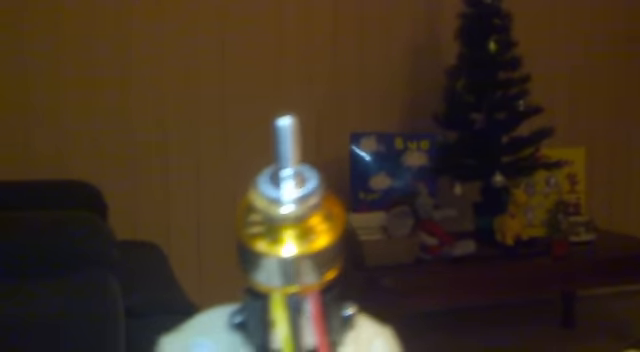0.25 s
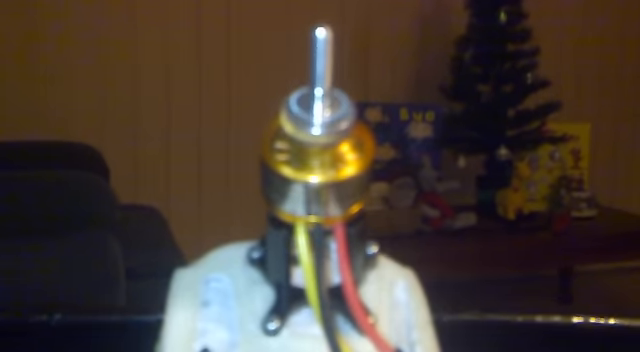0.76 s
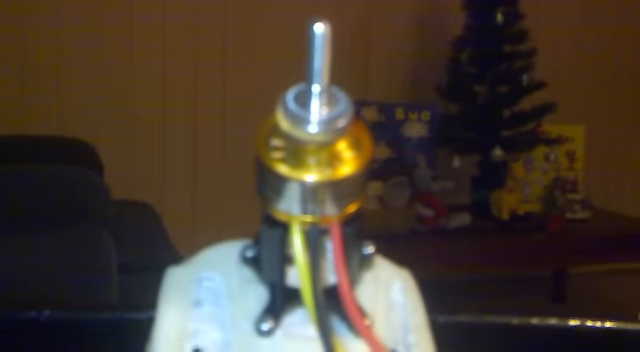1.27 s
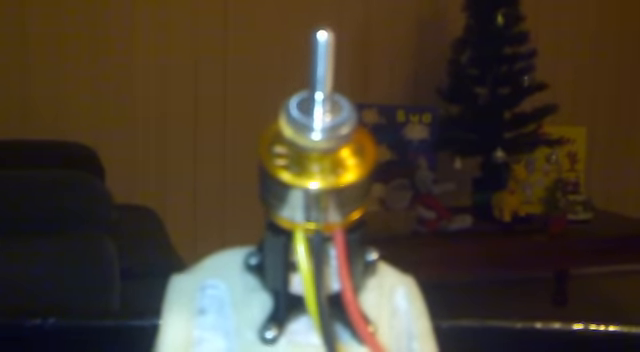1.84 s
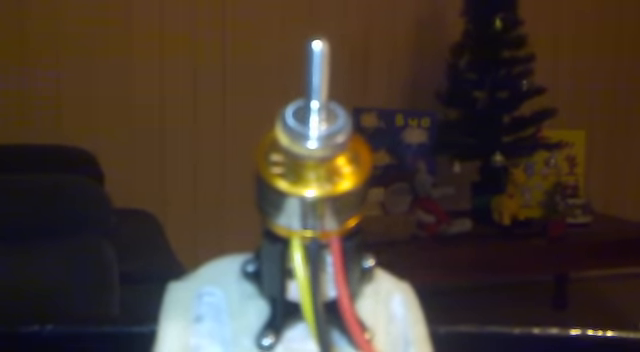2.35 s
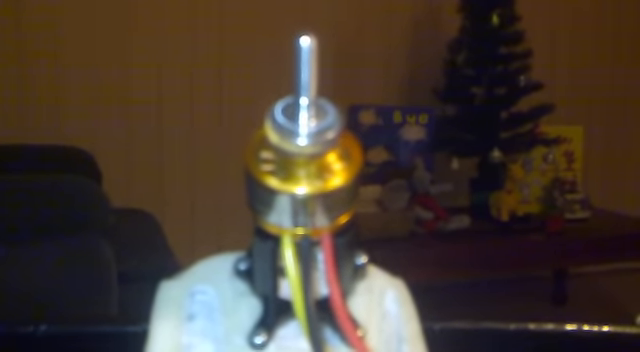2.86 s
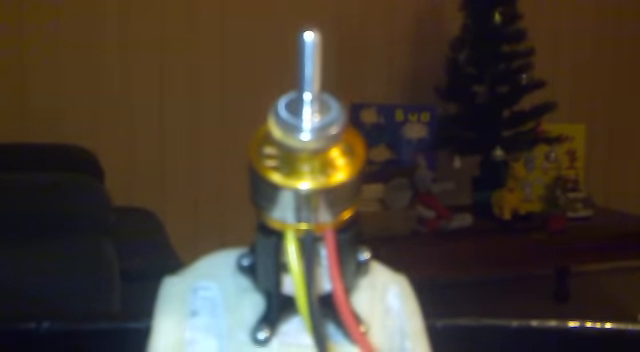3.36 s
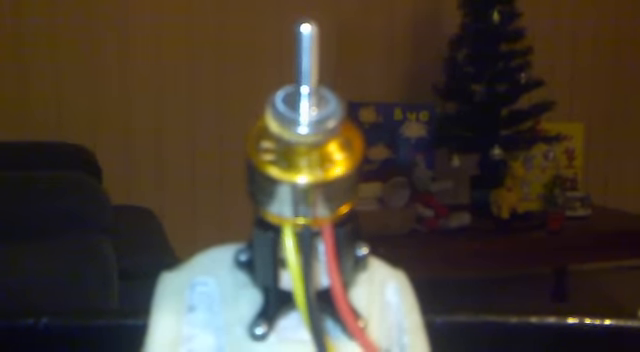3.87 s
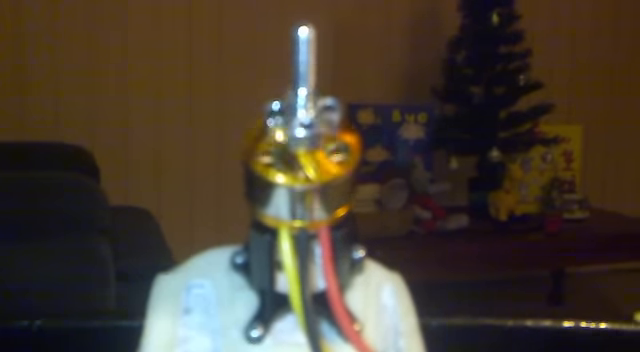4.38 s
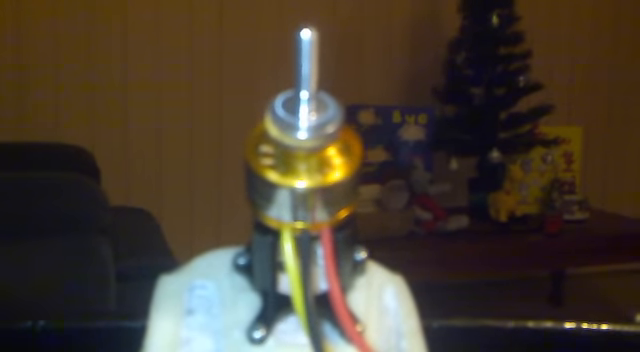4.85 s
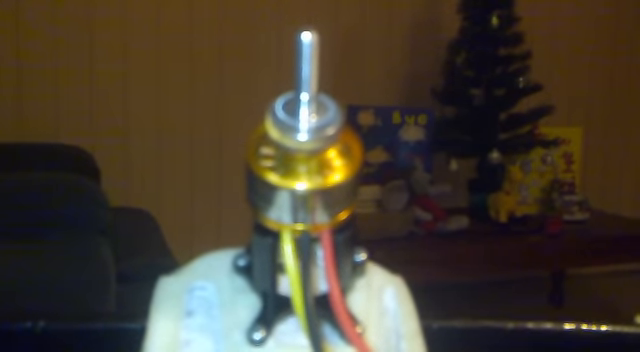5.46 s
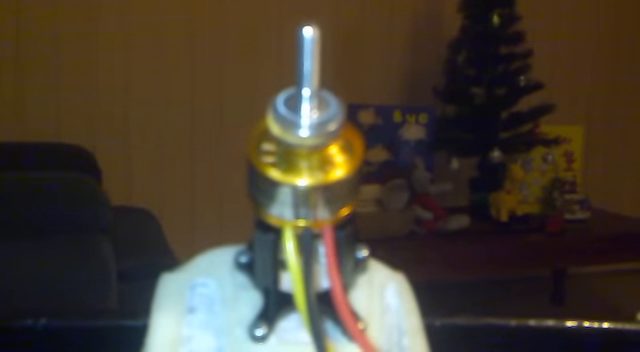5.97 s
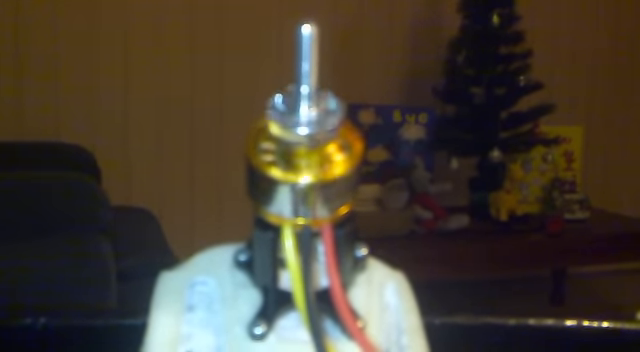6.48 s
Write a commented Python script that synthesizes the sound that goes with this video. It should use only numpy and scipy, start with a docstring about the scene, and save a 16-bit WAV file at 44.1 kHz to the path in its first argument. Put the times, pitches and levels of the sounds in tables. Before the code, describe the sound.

A small electric motor with a dry bearing rattles and squeals loudly, speeds up, winds down, restarts smoothly with a thin whistle, rattles again and coasts.

```python
"""The dry ball bearing of a small brushless outrunner, close to the microphone in a living room.
The motor has no propeller. Its bearing squeals on the tones of the turning cage and knocks with random ball hits;
the shaft speeds up, winds down and stops. It restarts smoothly with a thin whistle of chopped drive current,
the bearing breaks into rattling again, and the motor coasts to rest and just begins another start.
Slot whine, rolling hiss, hum and rumble follow the same shaft; a short room tail and faint room noise lie behind."""
import sys
import numpy as np
from scipy import signal
from scipy.fft import rfft, irfft
from scipy.io import wavfile
from scipy.ndimage import uniform_filter1d, minimum_filter1d

SR = 44100
rng = np.random.default_rng(int(sys.argv[2]) if len(sys.argv) > 2 else 0)


def generate_wav(sig):
    """Save sig (samples, or channels by samples) to the path in sys.argv[1] as 16-bit PCM at SR."""
    pcm = np.round(np.clip(np.atleast_2d(sig).T, -1, 1) * 32767).astype(np.int16)
    wavfile.write(sys.argv[1], SR, pcm)


N = 296352
TIME = np.arange(N) / SR

# The bearing cage catches and shrieks: (time [s], level [dB], length [s])
SHRIEKS = [(1.865, -12, .008), (2.1, -13, .015), (2.6, -13, .02), (2.977, -10, .005), (3.034, -14.5, .02),
           (3.098, -18, .03), (3.16, -9, .008), (3.194, -15, .01), (3.302, -14, .003), (3.437, -25, .03),
           (5.249, -12.5, .016), (5.374, -10, .032), (5.452, -12.5, .008), (5.509, -15.5, .009),
           (5.54, -16, .008), (5.556, -13, .011), (5.686, -15, .022), (5.781, -14.5, .0033)]
SHRIEK_HZ, BALLS = 1680, 6
CAGE_RATIO = .3975  # cage turns per shaft turn
# Tones of the six-ball cage, one entry per tone: (multiple of the cage speed)
CAGE_MULTIPLES = [6, 8, 11, 12, 13, 16, 18, 24, 30, 36, 42, 48, 54]
# The same tones: (relative level [dB])
CAGE_DB = [-9, -14, -4, -9.5, -4.5, -11.5, -1.2, 0, -6, -7, -13, -12, -16.5]
# The same tones: (share of power that flutters [0-1])
CAGE_ROUGH = [.8, .4, .6, .25, .45, .25, .72, .54, .88, .88, .95, .95, .95]
# Cage tones break up into flutter as they rise through this range: (from [Hz], to [Hz])
BREAK_UP_HZ = (1740, 2050)
# Stretches where the bearing rattles: (from [s], to [s])
RATTLES = [(0, 3.962), (5.238, 6.04)]
# Rattle against shaft speed: (speed [turns/s], relative squeal [dB], relative knocking [dB],
# relative hard metal contact [dB], gain of the highest fizz within the metal [dB])
RATTLE_BY_SPEED = [(51.7, -25, -22.5, -41, -23), (110.9, -20.5, -16.5, -29.5, -7.5),
                   (148, -12, -18.5, -23.5, -9), (177, -9.5, -20, -21.5, -1),
                   (203, -12, -19.5, -20.5, -0.5), (230.3, -5.5, -21, -21.5, 3)]
# The balls clatter harder for a moment: (time [s], lift of the metal contact [dB])
CLATTERS = [(.42, 4), (.93, 5.5), (1.49, 5.5), (1.694, 7), (1.87, 6.5), (2.29, 5), (2.411, 6.5), (2.49, 9),
            (2.672, 5), (2.742, 9.5), (2.868, 6.5), (3.031, 6), (3.303, 7.5), (3.385, 5), (5.25, 9.5),
            (5.56, 2.5), (5.65, 5)]
CLATTER_S = 0.019
# Wobble of the shaft in its worn bearing, driving rattle, hum and rumble: (time [s], lift [dB])
WOBBLE = [(0, 2), (.42, 0), (.55, -2.5), (1.38, -3), (1.75, -5.5), (2.6, -8), (3.15, -9), (3.95, -13),
          (5.3, -12), (6.05, -14.5)]

# Broad response of motor and mount: (frequency [Hz], gain [dB])
BODY = [(30, -31.5), (120, -24.5), (370, -14), (490, -6), (700, 5), (980, -9.5), (1250, 3), (1900, 5),
        (2400, -5.5), (4600, 0.5), (5700, -12.5), (8500, -18.5), (12500, -22), (15500, -21.5)]
# Ringing modes on top of that response: (frequency [Hz], width [Hz], lift [dB])
MODES = [(527, 74, 4), (744.4, 12, 2.5), (918, 34, 5.9), (1046, 72, 7), (1160, 170, 1.4), (1390, 110, 4.6),
         (1570.5, 125, 11.25), (1683.5, 110, 6.14), (2078, 400, 8.5), (2721, 93, 6), (4140, 460, 1.1),
         (5177, 410, 15.9), (5847, 180, 8.7), (7330, 1200, 7.8), (9560, 1000, 3.3), (14600, 1400, 5.8)]
BELL_HZ, BELL_WIDTH_HZ = 4360, 550  # main ring of the rotor bell

# Runs of the motor: (power on [s], power off [s], dry friction when coasting [turns/s per s])
RUNS = [(-2, 3.97, 87), (4.6, 6.05, 122), (6.685, 8, 122)]
# Throttle: (time [s], shaft speed asked for [turns/s])
THROTTLE = [(0, 170), (.15, 174.5), (.5, 177), (1.43, 177.5), (1.6, 222), (2.74, 222.5), (2.95, 203),
            (3.11, 177), (3.3, 140), (3.7, 77), (3.97, 49), (4.6, 164), (5.28, 165), (5.42, 173),
            (5.56, 175.5), (5.8, 157), (5.9, 151), (6.05, 125)]
# Soft start: first kick [share of the speed], time to about half speed [s], steepness of the S-curve
KICK, HALF_SPEED_S, START_STEEPNESS = .075, .207, 3.5
DRAG_PER_S = 1.55
CRUISE_HZ = 177  # shaft turns per second

# Tones of the twelve-slot stator, one entry per tone: (multiple of the shaft speed)
SLOT_MULTIPLES = [2, 3, 4, 8, 10.5, 12, 14, 17, 24, 25, 28, 36, 56]
# The same tones under power: (relative level [dB])
DRIVEN_DB = [-12, -24, -20, -15, -2, 7, -4, -13, 4, 1, 5, -2, -3]
# The same tones when coasting: (relative level [dB])
COASTING_DB = [-30, -30, -30, -20, -20, 1, -30, -30, -9, -30, -30, 2, -30]
# The slowing rotor cogs and rocks its mount: (time [s], lift of the mount's ring [dB], length [s])
ROCKS = [(4.163, 17.5, .045), (4.248, 12, 0.037), (6.423, 8, 0.047), (6.562, 8, 0.027)]

# Switching tones: (multiple of the switching rate, offset [shaft speeds], relative level [dB])
SWITCH_TONES = [(1, 0, -3), (1, -14, 6), (1, 14, -6), (1, -28, -8), (1, 9, -16), (1, 12, -17), (2, 0, -10),
                (2, -14, -11), (2, -4, -12)]
SWITCH_HZ = 7640

# Hum of the unbalanced rotor: (shaft speed [turns/s], level before the wobble [dB])
HUM_BY_SPEED = [(50, -82), (110, -72), (128, -53), (142, -47), (155, -41), (177, -35), (222, -36.5)]
HUM_NULL_HZ, HUM_NULL_WIDTH_HZ = 211.5, 7

# Reverberation of the furnished room: (frequency [Hz], time to fall by 60 dB [s])
ROOM_T60 = [(200, 0.76), (1500, 0.23), (5000, 0.047), (15000, 0.12)]
# Colour of the room noise: (frequency [Hz], relative density [dB per Hz])
FLOOR = [(30, -20.5), (140, -10), (450, -9), (800, -20), (1500, -28), (15000, -42)]
FLOOR_DB = -84
# Low hum in the room: (frequency [Hz], level before wavering [dB])
ROOM_HUM = [(140, -86.5), (270, -84)]
EDGE_HZ = 15800  # upper band limit


def bearing(speed, angle, squeal_db=-1.0, knock_db=3.0, metal_db=0., shriek_db=0., split_hz=2400,
            trade_db=1.3, trade_hz=14, restless_db=1.6):
    """The rattling bearing: squeal and dull knocks take turns, under a bright edge that dulls as the rotor slows."""
    table = np.asarray(RATTLE_BY_SPEED)
    squealing, knocking, contact, fizzing = (
        amp(read(np.c_[table[:, 0], column], speed)) for column in table.T[1:])
    trade = amp(trade_db * np.clip(wander(trade_hz), -2, 2))

    whirl = steady(squeal(speed, angle), 0.035) * squealing * amp(squeal_db) * trade

    dull, bright = split(knocks(speed, angle), split_hz)
    dull = steady(dull, 0.34) * knocking * amp(knock_db) / trade

    ring, fizz = split(bright, 5000)
    clatter_db = sum(db * bump(s, CLATTER_S) for s, db in CLATTERS)
    clatter = amp(clatter_db + restless_db * wander(14))
    metal = steady(ring + fizz * fizzing, 0.16) * contact * amp(metal_db) * clatter

    rattling = sum(gate(start, end, edge_s=0.002) for start, end in RATTLES)
    rattle = (whirl + dull + metal) * rattling * amp(curve(WOBBLE))
    return rattle + amp(shriek_db) * shrieks(speed, angle)


def squeal(speed, angle, flutter_hz=55, surge_db=2.5):
    """Balls whirl with the slipping cage; its tones swell as they cross the modes of the motor."""
    cage_angle = CAGE_RATIO * angle + .02 * wander(12)  # radians, with a little slip
    # The flutter is read along the turning itself, so it slows down with the shaft
    turning_time = np.cumsum(speed / 180) / SR
    tones = np.zeros(N)
    for multiple, db, rough in zip(CAGE_MULTIPLES, CAGE_DB, CAGE_ROUGH):
        complex_noise = wander(flutter_hz) + 1j * wander(flutter_hz)
        flutter = np.interp(turning_time, TIME, unit(complex_noise))
        tone_hz = multiple * CAGE_RATIO * speed
        rough = np.interp(tone_hz, BREAK_UP_HZ, (rough, max(rough, .86)))
        envelope = np.sqrt(1 - rough) + np.sqrt(rough) * flutter
        tones += amp(db) * (envelope * np.exp(1j * multiple * cage_angle)).real
    surging = amp(surge_db * np.interp(turning_time, TIME, wander(70)))
    return body(tones * surging)


def knocks(speed, angle, per_turn=26, spread_db=1.0, clump_db=2.0, load=0.21):
    """Loose balls hit the races, hardest when one passes the loaded side, and in clumps."""
    hits = (rng.random(N) < per_turn * speed / SR) * rng.choice([-1, 1], N)
    clumps = clump_db * np.clip(wander(53), -2, 2)
    size = amp(spread_db * rng.standard_normal(N) + clumps)
    passing = np.cos(BALLS * CAGE_RATIO * angle)
    return body(hits * size * (1 + load * passing))


def shrieks(speed, angle):
    """Brief swells of whichever ball-pass harmonic lies nearest the motor's main mode."""
    out = np.zeros(N)
    ball_pass = BALLS * CAGE_RATIO  # balls passing per shaft turn
    for s, db, length in SHRIEKS:
        multiple = round(SHRIEK_HZ / (ball_pass * np.interp(s, TIME, speed)))
        out += amp(db) * bump(s, length) * np.sqrt(2) * np.cos(multiple * ball_pass * angle)
    return out


def body(x):
    """The causal ring of the bell, stator and mount, as a minimum-phase response."""
    hz = np.fft.fftfreq(4096, 1 / SR)
    modes_db = sum(lift / (1 + (2 * (abs(hz) - f) / width) ** 2) for f, width, lift in MODES)
    log_gain = np.log(amp(read(BODY, hz) + modes_db))
    ring = np.fft.ifft(np.exp(np.conj(signal.hilbert(log_gain)))).real
    return signal.oaconvolve(x, ring[:len(ring) // 2])[:N]


def shaft_speed():
    """Turns per second: a soft start up to the throttle, then dry friction and drag once the power is cut."""
    speed = np.zeros(N)
    for on, off, friction in RUNS:
        rise = (np.maximum(TIME - on, 0) / HALF_SPEED_S) ** START_STEEPNESS
        driven = curve(THROTTLE) * (KICK + rise) / (1 + rise)
        friction_offset = friction / DRAG_PER_S
        speed_at_cut = np.interp(off, TIME, driven)
        decay = np.exp(-DRAG_PER_S * (TIME - off))
        coasting = (speed_at_cut + friction_offset) * decay - friction_offset
        speed = np.where(TIME < on, speed, np.where(TIME < off, driven, coasting))
    return np.maximum(speed, .1)  # stays above zero for the logarithms


def powered():
    """1 while the controller drives the windings."""
    return sum(gate(on, off, edge_s=.004) for on, off, friction in RUNS)


def surge(speed):
    """Share of the starting current, 0-1: back-EMF cuts it as the rotor reaches the speed asked for."""
    return powered() * np.clip(1 - speed / curve(THROTTLE), 0, 1)


def by_speed(speed, db_per_octave):
    """Gain that grows with every doubling of the speed; 1 at cruise."""
    return amp(db_per_octave * np.log2(speed / CRUISE_HZ))


def whine(speed, angle, driven_db=-62.0, coasting_db=-66.0, db_per_octave=3.0, stall_hz=11,
          shudder_db=-23., shudder_hz=900, mount_hz=470, mount_width_hz=150, mount_db=-48.0, bell_db=12.5):
    """Magnets sweep the stator slots; the ripple rocks the slow mount and rings the bell under heavy current."""
    current = powered()
    waver = .5 - .15 * current
    slots = np.zeros(N)
    for multiple, driven, coasting in zip(SLOT_MULTIPLES, DRIVEN_DB, COASTING_DB):
        level = amp(coasting + current * (driven - coasting))
        slots += level * (1 + waver * wander(30)) * np.cos(multiple * angle)
    shudder = amp(shudder_db) * unit(band(rng.standard_normal(N), shudder_hz, "low", order=2))
    ripple = body(slots + shudder)

    bell = resonance(ripple, BELL_HZ, BELL_WIDTH_HZ) * amp(bell_db) * surge(speed)
    direct = (ripple + bell) * amp(coasting_db + current * (driven_db - coasting_db))

    mount = resonance(resonance(ripple, mount_hz, mount_width_hz), mount_hz, mount_width_hz)
    cogging = 1 / (1 + (speed / 70) ** 2)  # rocks the mount mostly when slow
    rocking = amp(mount_db + sum(db * bump(s, length) for s, db, length in ROCKS))

    sound = band(direct + rocking * cogging * mount, 280, "high")  # the small motor radiates little bass
    turning = np.minimum(speed / stall_hz, 1) ** 2  # fades out towards standstill
    return sound * turning * by_speed(speed, db_per_octave)


def rolling(speed, driven_db=-54.5, coasting_db=-66.0, db_per_octave=7.5, bell_db=-31.0,
            bell_db_per_octave=9.0, top_hz=4400):
    """Smoothly rolling balls hiss; the heavy current of acceleration also rings the rotor bell."""
    hiss = band(body(rng.standard_normal(N)), top_hz, "low", order=2)
    hiss = hiss / np.std(band(hiss, 2500, "high"))  # levels refer to the part above 2500 Hz
    hiss = hiss * amp(coasting_db + powered() * (driven_db - coasting_db))
    bell = resonance(rng.standard_normal(N), BELL_HZ, BELL_WIDTH_HZ)
    bell = unit(resonance(bell, BELL_HZ, BELL_WIDTH_HZ))
    bell = amp(bell_db) * bell * surge(speed) * by_speed(speed, bell_db_per_octave)
    return hiss * by_speed(speed, db_per_octave) + bell


def controller(speed, angle, whistle_db=-63.5, surge_db=7.5, swell_s=0.18, waver=0.27):
    """Chopped winding current whistles, with sidebands that spread as the fourteen poles speed up."""
    carrier = 2 * np.pi * SWITCH_HZ * TIME
    tones = np.zeros(N)
    for multiple, offset, db in SWITCH_TONES:
        phase = multiple * carrier + offset * angle + 2 * np.pi * rng.random()
        tones += amp(db) * (1 + waver * wander(30)) * np.cos(phase)
    duty = sum(gate(on, off, edge_s=.004) * np.clip((TIME - on) / swell_s, .25, 1)
               for on, off, friction in RUNS)
    duty = duty * by_speed(curve(THROTTLE), db_per_octave=15.5)
    return np.sqrt(2) * tones * duty * amp(whistle_db + surge_db * np.sqrt(surge(speed)))


def unbalance(speed, angle):
    """The rotor hums once a turn, and nearly drops out at one speed where the mount stands still."""
    null = 1 - .92 * np.exp(-((speed - HUM_NULL_HZ) / HUM_NULL_WIDTH_HZ) ** 2)
    level = amp(read(HUM_BY_SPEED, speed) + curve(WOBBLE))
    return np.sqrt(2) * level * null * np.sin(angle)


def rumble(speed, rumble_db=-52.5, top_hz=90, follow=1.9, db_per_octave=6.0):
    """The wobbling motor shakes its stand: a soft low rumble."""
    low_noise = band(rng.standard_normal(N), top_hz, "low", order=2)
    noise = unit(band(low_noise, 30, "high", order=2))
    level = amp(rumble_db + follow * curve(WOBBLE))
    return noise * level * by_speed(np.minimum(speed, CRUISE_HZ), db_per_octave)


def room(x, wet_db=-12.):
    """Adds a short tail of sparse random echoes from a furnished room, each band fading at its own rate."""
    length = SR // 2
    echoes = rng.standard_normal(length) * (rng.random(length) < .07) * (TIME[:length] > .004)
    hz, t, spectrum = signal.stft(echoes, SR, nperseg=256)
    decay = np.exp(-np.log(1000) * t / read(ROOM_T60, hz)[:, None])
    tail = signal.istft(spectrum * decay, SR)[1]
    return x + amp(wet_db) * signal.oaconvolve(x, tail / np.linalg.norm(tail))[:N]


def background():
    """Faint room noise, shaped in frequency, with a low wavering hum."""
    colour = amp(read(FLOOR, np.fft.rfftfreq(N, 1 / SR)))
    hiss = irfft(rfft(rng.standard_normal(N)) * colour, N)
    hum = sum(amp(db) * (1 + wander(6)) * np.sin(2 * np.pi * hz * TIME) for hz, db in ROOM_HUM)
    return amp(FLOOR_DB) * unit(hiss) + np.sqrt(2) * hum


def amp(db):
    """Decibels to gain."""
    return 10 ** (np.asarray(db) / 20)


def unit(x):
    """Scales to rms 1."""
    return x / np.sqrt(np.mean(abs(x) ** 2) + 1e-20)


def steady(x, span_s):
    """Holds the rms near 1 over spans of span_s, keeping faster flutter."""
    size = max(int(span_s * SR), 2)
    power = uniform_filter1d(uniform_filter1d(x ** 2, size), size)
    return x / np.sqrt(abs(power) + 1e-12)


def curve(rows, axis=1):
    """One column of a table, joined by lines in time."""
    rows = np.asarray(rows)
    return np.interp(TIME, rows[:, 0], rows[:, axis])


def read(points, hz):
    """A table over frequency or shaft speed, joined on a log axis."""
    f, value = np.transpose(points)
    return np.interp(np.log(abs(hz) + 1), np.log(f), value)


def gate(on, off, edge_s):
    """1 between on and off, with short ramps outside."""
    return np.clip(1 + np.minimum(TIME - on, off - TIME) / edge_s, 0, 1)


def bump(s, length):
    """A brief bell-shaped swell of height 1; length is its width at 1/e."""
    return np.exp(-(2 * (TIME - s) / length) ** 2)


def wander(hz):
    """Random drift of rms 1, up to about hz."""
    return unit(band(rng.standard_normal(N), hz, "low", order=2))


def band(x, hz, kind, order=4):
    """Low-pass or high-pass."""
    return signal.sosfilt(signal.butter(order, hz, kind, fs=SR, output="sos"), x)


def split(x, hz):
    """The parts below and above hz, which add up to x."""
    low = signal.sosfiltfilt(signal.butter(4, hz, fs=SR, output="sos"), x)
    return low, x - low


def resonance(x, hz, width_hz):
    """One mode, with gain 1 at its centre."""
    return signal.lfilter(*signal.iirpeak(hz, hz / width_hz, fs=SR), x)


def scene():
    """All motor sounds follow one shaft; the room tail carries bearing, whine and rolling."""
    speed = shaft_speed()
    angle = 2 * np.pi * np.cumsum(speed) / SR
    motor = bearing(speed, angle) + whine(speed, angle) + rolling(speed)
    close = controller(speed, angle) + unbalance(speed, angle) + rumble(speed)
    return (room(motor) + close + background())[None]


def record(dry, ceiling_db=-4.0):
    """The microphone channel: a fast limiter holds the peaks, then a steep low-pass limits the band."""
    allowed_gain = np.minimum(1, amp(ceiling_db) / (abs(dry[0]) + 1e-9))
    gain = uniform_filter1d(minimum_filter1d(allowed_gain, size=130), size=130)
    low_pass = signal.firwin(511, EDGE_HZ, window=("kaiser", 9), fs=SR)
    return signal.oaconvolve(dry * gain, low_pass[None], "same")


dry = scene()
out = record(dry)
generate_wav(out)
```